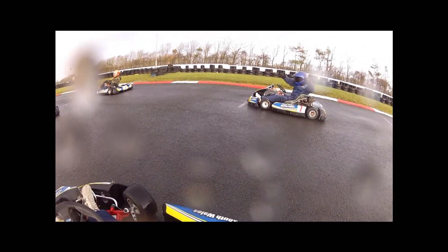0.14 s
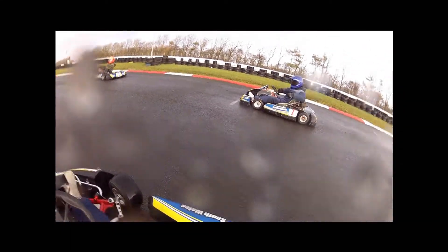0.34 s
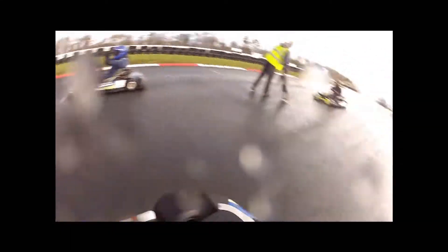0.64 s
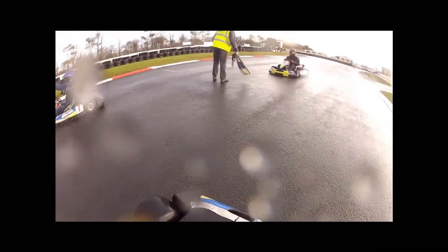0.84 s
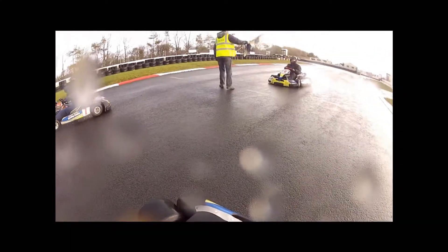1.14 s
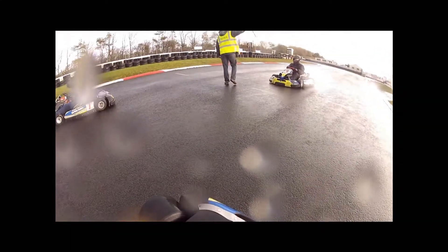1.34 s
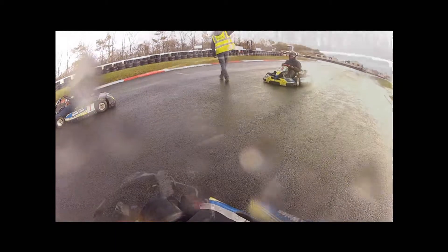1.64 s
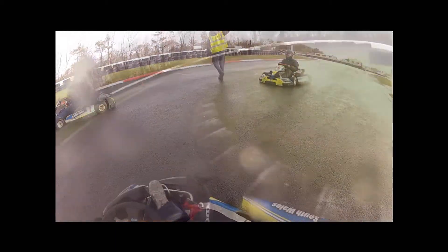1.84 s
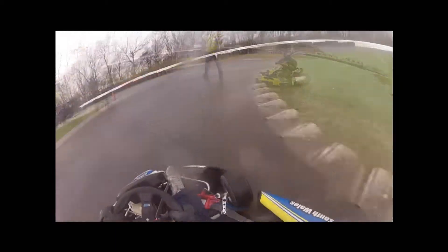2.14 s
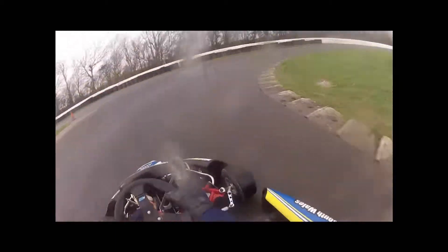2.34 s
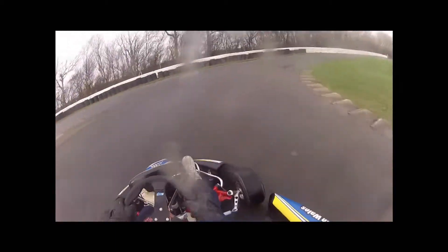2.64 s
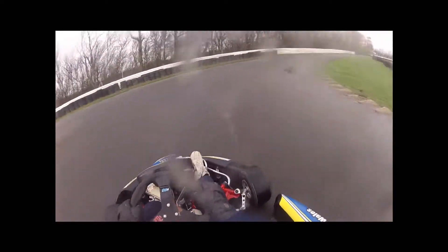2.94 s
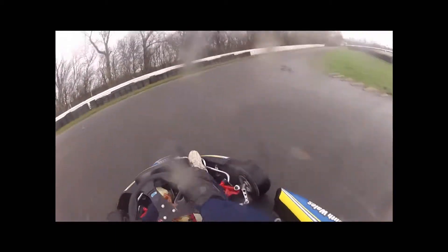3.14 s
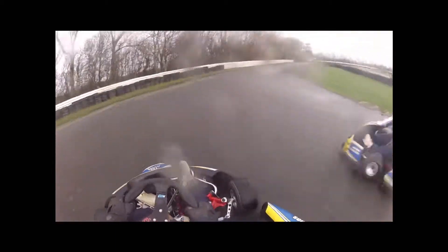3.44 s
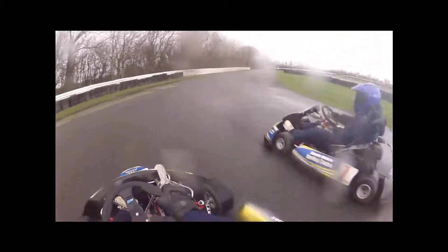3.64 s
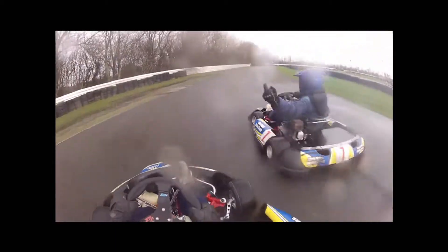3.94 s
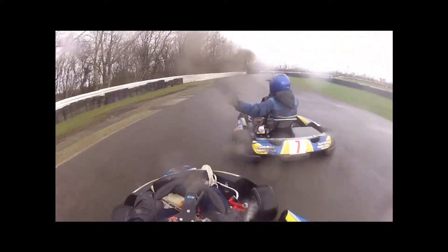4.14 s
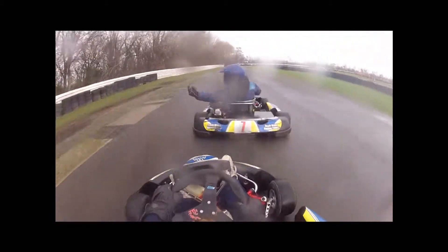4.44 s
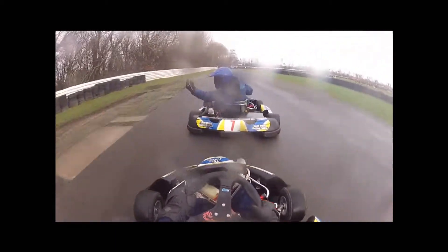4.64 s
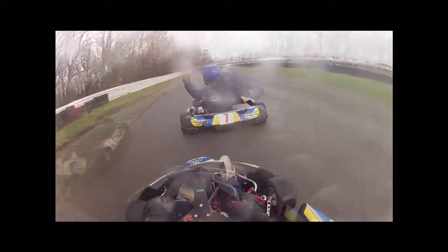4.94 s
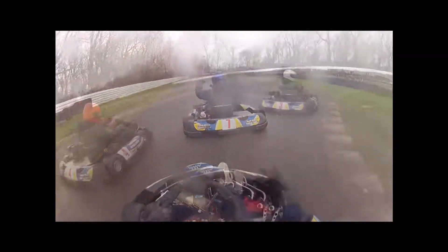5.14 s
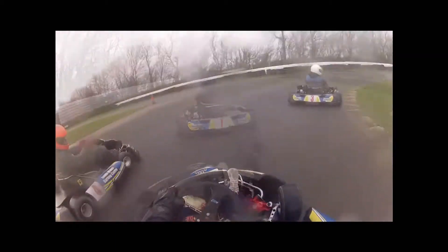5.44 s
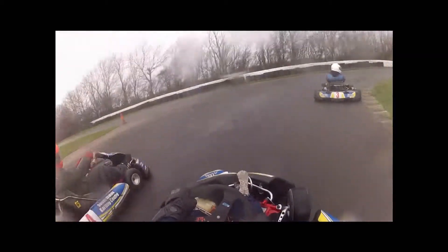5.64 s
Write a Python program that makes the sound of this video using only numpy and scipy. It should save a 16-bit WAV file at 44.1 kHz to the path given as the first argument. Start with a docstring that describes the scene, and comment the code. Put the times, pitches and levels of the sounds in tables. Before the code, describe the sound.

Quiet rolling rumble and a few water ticks, then a sudden jump to a louder go-kart engine with booming wind in an enclosed helmet microphone.

```python
"""A four-stroke go-kart's engine on a wet track, heard from inside a plastic case on the driver's helmet.
The engine is a sum of wobbling harmonics of the firing rate plus noise bursts, timed to each firing, that ring
the metal. At first the kart only rolls, as shaped noise, while drops tick on the case as short noise pulses; then the
sound jumps to a louder passage with engine and wind: noise through the case's resonances, and buffets as sine pulses.
A second kart overtakes closely as its own noise bursts; squeaks glide with their alias; 12 kHz interference is faint."""
import sys
import numpy as np
from scipy import signal
from scipy.fft import rfft, irfft
from scipy.io import wavfile
from scipy.ndimage import uniform_filter1d

SR = 44100
rng = np.random.default_rng(int(sys.argv[2]) if len(sys.argv) > 2 else 0)


def put_to_file(sound):
    """Save the sound as 16-bit audio at rate SR, in the file named by the first command-line argument."""
    columns = np.atleast_2d(sound).T  # one column per channel
    safe = np.clip(columns, -1, 1)
    whole_steps = np.round(safe * 32767)
    wavfile.write(sys.argv[1], SR, whole_steps.astype(np.int16))


N = 255780
TIME = np.arange(N) / SR
FREQ = np.maximum(np.arange(N // 2 + 1) * SR / N, 1)
# a cut: the sound jumps to a louder passage with engine and wind
JUMP_S = 1.483

# Own engine's firing rate. Each row: time in seconds, firings per second in Hz.
FIRING_RATE = [(1.5, 28.0), (2.75, 26.0), (2.9, 27.69), (3.1, 30.66), (3.5, 31.85), (4.0, 32.36),
               (4.6, 32.23), (5.2, 32.4), (5.8, 32.06)]


def undb(db):
    """Decibels to gain."""
    return np.exp(np.asarray(db) * (np.log(10) / 20))


def unit(x):
    """Scale to rms 1."""
    return x / np.sqrt(np.mean(x ** 2))


def curves(rows):
    """Each column of a table, joined by straight lines in time."""
    time_s, *columns = np.transpose(rows)
    return [np.interp(TIME, time_s, column) for column in columns]


def noise():
    """White noise."""
    return rng.standard_normal(N)


def walk(rate_hz):
    """Smooth random signal of rms 1 that changes about rate_hz times a second."""
    width = max(int(SR / rate_hz), 1)
    smooth = uniform_filter1d(noise(), width, mode="wrap")
    return unit(uniform_filter1d(smooth, width, mode="wrap"))


def shape(x, gain):
    """Minimum-phase filter with the given relative gain at each frequency."""
    cepstrum = irfft(np.log(gain / gain.max() + 1e-5), N)
    # fold onto positive time: causal
    cepstrum[1:N // 2] *= 2
    cepstrum[N // 2 + 1:] = 0
    return irfft(rfft(x) * np.exp(rfft(cepstrum)), N)


def ring(x, modes):
    """Pass through steep-sided resonances (Hz, width in Hz, dB); rms 1."""
    power = 0
    for hz, width_hz, db in modes:
        detuning = (FREQ ** 2 - hz ** 2) / (FREQ * width_hz)
        power = power + undb(db) ** 2 / (1 + detuning ** 2 / 2) ** 2
    return unit(shape(x, np.sqrt(power)))


def tinted(spectrum):
    """Noise with a spectrum of (Hz, dB per Hz) points, joined over log frequency; rms 1."""
    hz, db = np.transpose(spectrum)
    return unit(shape(noise(), undb(np.interp(np.log(FREQ), np.log(hz), db))))


def reflected(x, lag_s, sway_s, share):
    """Add a reflection whose path length sways, so that the colour drifts."""
    return x + share * np.interp(TIME - lag_s - sway_s * walk(8.8), TIME, x)


def cycles(hz, firing_s):
    """Count of engine cycles, whole at each firing; firing_s is the time of one firing."""
    count = np.cumsum(hz) / SR
    return count - np.interp(firing_s, TIME, count)


def bursts(turn, hz, lead_s, rise_s, decay_s, scatter_db, grit_db=2):
    """One burst of gritty noise per cycle, each of random strength."""
    turn = turn + lead_s * hz
    age_s = turn % 1 / hz
    strengths = undb(scatter_db * (2 * rng.random(512) - 1.5))
    size = strengths[np.floor(turn).astype(int) % 512]
    grit = noise() * undb(grit_db * walk(3000))
    envelope = (1 - np.exp(-(age_s / rise_s) ** 2)) * np.exp(-age_s / decay_s)
    return size * envelope * grit


def crawl():
    """Rolling slowly: steady rumble, a boom that grows as the kart gathers way, fluttering hiss of wet tyres."""
    # Rolling rumble. Each row: frequency in Hz, level in dB per Hz.
    roll = [(15, -4), (30, 6), (48, -6), (70, -3), (150, -2), (240, 4.5), (320, -4.5), (480, -13),
            (750, -17.5), (1500, -41)]
    # Case resonances at a crawl. Each row: frequency in Hz, width in Hz, level in dB.
    case_slow = [(1186, 360, 0.5), (1610, 180, 2), (1910, 250, 2), (2420, 310, 0), (2970, 1100, -11.5),
                 (3527, 206, 5), (4270, 1400, -14.5), (7300, 1000, -17.5), (8470, 220, -2),
                 (9840, 900, -12.5), (10640, 130, -16), (14100, 990, -14.5)]
    hiss_db, rumble_db, boom_db, boom_db_per_s = -56, -55.5, -64, 9
    rumble = tinted(roll) * undb(rumble_db + 1.7 * walk(39))
    boom = ring(noise(), [(107, 23, 0)]) * undb(boom_db + boom_db_per_s * TIME)
    flutter = noise() * undb(1.6 * walk(1000) + 1.37 * walk(61))
    hiss = ring(flutter, case_slow) * undb(hiss_db)
    return (rumble + boom + hiss) * (TIME <= JUMP_S)


def squeaks(bend=0.25, mirror_hz=6000):
    """Rubbing metal squeaks briefly, with a mirror image about 6 kHz: an alias that glides the opposite way."""
    # Squeaks in the bends. Each row: centre in seconds, length in seconds, level in dB,
    # greatest distance of the tones from the mirror frequency in Hz.
    squeak_rows = [(2.825, 0.011, -49.5, 1380), (2.887, 0.006, -53, 1380), (2.926, 0.0075, -48, 1170),
                   (5.702, 0.033, -51, 1530)]
    # Lower, then upper tone. Each row: waver in Hz, level in dB.
    tone_rows = [(87, 0), (80, -3.5)]
    out = 0
    for at_s, length_s, db, offset_hz in squeak_rows:
        swell = np.exp(-((TIME - at_s) / length_s) ** 2 / 2)
        for side, (waver_hz, tone_db) in zip((-1, 1), tone_rows):
            offset = side * offset_hz * (1 + bend * (swell - 1))
            glide_hz = mirror_hz + offset + waver_hz * walk(1500)
            tone = np.sin(2 * np.pi * np.cumsum(glide_hz) / SR)
            out = out + undb(db + tone_db) * swell * tone
    return out * undb(2 * walk(300))


def drops(decay_s=0.0011, tick_db=-3, body_db=-2.0):
    """Drops and grit spatter on the case: a bright tick, and a duller knock that weakens for lighter ones."""
    # Each row: start in seconds, strength in dB.
    drop_rows = [(0.5472, -38.5), (0.5586, -39), (0.5677, -36), (0.631, -41), (0.6399, -37.5),
                 (0.6686, -40.5), (0.6945, -37), (0.7327, -38), (0.8036, -42), (1.0789, -42), (1.3632, -41)]
    # Ring of a drop on the case. Each row: frequency in Hz, width in Hz, level in dB.
    drop_ring = [(3600, 580, 4), (5000, 380, -2), (6900, 450, -4), (8160, 360, -0.5), (9800, 640, -6.5),
                 (14300, 800, -7)]
    # from heavy_db up, the knock is driven as strongly as the tick
    heavy_db, knock_slope_db_per_db = -39, 2.5
    tick, knock = np.zeros((2, N))
    for start_s, db in drop_rows:
        weight_db = knock_slope_db_per_db * min(db - heavy_db, 0)
        now = (TIME >= start_s) & (TIME < start_s + 10 * decay_s)
        splash = undb(db) * np.exp(-(TIME[now] - start_s) / decay_s)
        tick[now] += splash
        knock[now] += undb(weight_db) * splash
    bright = ring(tick * noise(), drop_ring) * tick.std()
    dull = ring(knock * noise(), [(1270, 300, 0.5), (2140, 510, 3)]) * knock.std()
    return undb(tick_db) * bright + undb(body_db) * dull


def buffets(pitch_hz=103.6, overtone_db=-23):
    """Eddies strike the case, which booms at one pitch for a few cycles, with a faint octave above."""
    # Each row: centre in seconds, peak in dB, swell time in seconds.
    buffet_rows = [(0.755, -37.5, 0.0055), (1.602, -19, 0.018), (1.708, -22.5, 0.0125),
                   (1.889, -21.5, 0.014), (2.037, -20, .015), (2.115, -21.5, 0.026), (2.22, -23, 0.017),
                   (2.44, -24, 0.011), (2.528, -29, 0.029), (4.971, -20.5, 0.0085), (5.085, -20, 0.029),
                   (5.218, -15, 0.021), (5.372, -19.5, 0.034), (5.674, -27, 0.012)]
    out = np.zeros(N)
    for (centre_s, db, swell_s), phase in zip(buffet_rows, rng.random(len(buffet_rows))):
        age_s = TIME - centre_s
        angle = 2 * np.pi * (pitch_hz * age_s + phase)
        boom = np.sin(angle) + undb(overtone_db) * np.sin(2 * angle)
        out += undb(db) * np.exp(-(age_s / swell_s) ** 2 / 2) * boom
    return out


def air():
    """Wind booms in the case, air and spray hiss through its resonances; the booms modulate 12 kHz interference."""
    # Wind strength on the helmet. Each row: time in seconds, strength in dB.
    wind = [(1.5, 1.5), (1.72, -.5), (1.92, 3), (2.3, -2), (2.75, -3), (3.2, 0), (3.9, -1.5), (4.6, -2.5),
            (5.08, 5.5), (5.35, 3), (5.8, 2)]
    # Wind rumble. Each row: frequency in Hz, level in dB per Hz.
    rumble_spectrum = [(15, -3), (30, 4.5), (60, 0.5), (100, -3.5), (150, -2), (230, -3.5), (330, -2.5),
                       (480, -14), (800, -17), (1500, -34.5)]
    # Case resonances under air and spray. Each row: frequency in Hz, width in Hz, level in dB.
    case_modes = [(595, 830, -7.5), (843, 39, -2.5), (1196, 127, 0.5), (1544, 240, -2.5), (2000, 340, 0),
                  (2315, 303, 3.5), (3320, 410, -10), (3580, 235, -2.5), (4400, 620, -17.5),
                  (5100, 250, -15.5), (7140, 870, -20), (8430, 320, -11), (9730, 470, -8.5),
                  (10600, 110, -18), (13350, 110, -15), (14300, 290, -9.5)]
    wind_db, = curves(wind)
    hz, = curves(FIRING_RATE)
    # slopes in dB per dB of wind; rumble also grows with road speed, in dB per Hz of firing rate
    hiss_db = -43 + 1.08 * wind_db
    rumble_db = -43.5 + 0.41 * wind_db + 0.54 * (hz - hz.mean())
    boom_db = -36 + 1.54 * wind_db
    rumble = tinted(rumble_spectrum) * undb(rumble_db + 1.0 * walk(37))
    boom = ring(noise(), [(101.3, 22, 1.0), (67, 17.3, -6.5), (217, 27, -16.5)]) * undb(boom_db)
    thumps = buffets()
    spray = noise() * undb(0.75 * walk(810) + 1 * walk(38))
    # the hiss is briefly stronger at the sudden jump in level
    spray = spray * (1 + 0.3 * np.exp(-np.abs(TIME - JUMP_S) / 0.005))
    hiss = ring(spray, case_modes) * undb(hiss_db + .5 * walk(6.6))
    # faint electrical interference at 12 kHz, its strength modulated by the booms
    interference = undb(-35.0) * (boom + thumps) * np.sin(2 * np.pi * 12000 * TIME)
    return (rumble + boom + hiss + interference) * (TIME > JUMP_S) + thumps


def rival(firing_hz=30.3, firing_s=3.741):
    """A second kart barks past at its own steady revs: one noise burst per firing, mirrored by the wet tarmac."""
    # Pass of the kart. Each row: time in seconds, level in dB.
    passing = [(3.2, -51), (3.6, -50), (3.75, -38.5), (3.9, -43.5), (4.08, -43.5), (4.2, -47), (4.5, -71)]
    # Its resonances. Each row: frequency in Hz, width in Hz, level in dB.
    rival_body = [(1180, 570, -7), (2080, 630, -4), (3560, 290, 1), (5290, 300, -7.5), (6640, 460, -12),
                  (8350, 340, -7), (9800, 700, -13.5), (14100, 1200, -19)]
    near_db, = curves(passing)
    hz = np.full(N, firing_hz)
    turn = cycles(hz, firing_s)
    bark = bursts(turn, hz, lead_s=0.0031, rise_s=0.0049, decay_s=0.0033, scatter_db=3.5)
    bark = reflected(bark, lag_s=0.001196, sway_s=0.00032, share=0.63)
    present = (TIME > passing[0][0]) & (TIME < passing[-1][0])
    return undb(near_db) * ring(bark, rival_body) * present


def dip(start_s=3.81, fall_s=.08, hold_s=.18, recover_s=.17, depth_db=-17):
    """One brief dip of the crank-rate thrum, in dB: quick fall, hold, slower recovery."""
    age_s = TIME - start_s
    fall = np.clip(age_s / fall_s, 0, 1)
    recovery = np.exp(-np.maximum(age_s - fall_s - hold_s, 0) / recover_s)
    return depth_db * fall * recovery


def engine(firing_s=2.957, frame_hz=31.6, frame_width_hz=0.39):
    """The single cylinder thrums through the exhaust; each firing cracks and rattles the metal."""
    # Throttle: a blip in the bend, then held open. Each row: time in seconds, opening in dB.
    throttle = [(1.5, -18), (2.0, -5), (2.5, -17), (2.9, -10.5), (3.0, 0.5), (3.7, 2.5), (4.1, 5.5),
                (5.8, 4)]
    # Exhaust harmonics. Each row: multiple of the firing rate, relative level in dB.
    orders = [(1, -30), (2, -3), (3, -8), (4, -17.5), (5, -19), (6, -16), (7, -40), (9, -23.5), (10, -18.5),
              (12, -18.5)]
    # Resonances of the sharp crack, the clatter and the body panels.
    # Each row: frequency in Hz, width in Hz, level in dB.
    crack_modes = [(3640, 340, -7), (4710, 390, 6), (5270, 340, 7), (6770, 360, 5.5), (7410, 250, 2),
                   (8770, 250, 0.5), (9910, 590, 2.5)]
    clatter_modes = [(400, 200, -3), (798, 41, -5.5), (1197, 122, 1), (1720, 430, -7), (2010, 370, 3),
                     (2357, 260, 3.5), (2652, 86, 0.5), (3060, 120, -5), (3900, 420, -8), (8100, 210, -11),
                     (9500, 180, -6.5), (10100, 100, -21), (14250, 1000, -11.5)]
    panel_modes = [(1219, 63, 6), (1560, 160, 0.5), (1941, 270, 0), (2515, 68, -7.5), (3623, 216, -0.5),
                   (8350, 134, -4.5), (10740, 140, -13)]
    hz, = curves(FIRING_RATE)
    throttle_db, = curves(throttle)
    # peaks where the firing rate meets the frame's resonance
    resonance = np.exp(-((hz - frame_hz) / frame_width_hz) ** 2 / 2)
    crank_db = -30 + .42 * throttle_db + 3.5 * resonance + dip()
    # panels buzz a little at any revs, hard at the resonance
    buzz = undb(-53) + undb(-45) * resonance
    turn = cycles(hz, firing_s)
    thrum = 0
    for multiple, db in orders:
        wobble = 0.0091 * multiple * walk(8.3) + rng.random()
        # twice the firing rate is the crank rate, with its own level
        level_db = crank_db if multiple == 2 else .5 * throttle_db - 37.0
        tone = np.sin(2 * np.pi * (multiple * turn + wobble))
        thrum = thrum + undb(db + level_db + walk(14)) * tone
    crack = bursts(turn, hz, lead_s=0.0048, rise_s=0.0065, decay_s=0.0039, scatter_db=2)
    # the piston knocks again, more softly, one crank turn later
    knock = bursts(turn + .5, hz, lead_s=.003, rise_s=0.0038, decay_s=0.0053, scatter_db=13)
    rattle = bursts(turn, hz, lead_s=0.0045, rise_s=0.0045, decay_s=0.01, scatter_db=2.0)
    # the rattle also reaches the helmet by way of the swaying bodywork
    rattle = reflected(rattle, lag_s=0.00152, sway_s=0.000266, share=0.63)
    metal = undb(-55.0) * ring(crack + 0.19 * knock, crack_modes)
    metal = metal + undb(-47.5) * ring(rattle, clatter_modes)
    # the panels ring on longest between firings
    shaking = bursts(turn, hz, lead_s=0.0032, rise_s=0.0023, decay_s=0.019, scatter_db=2.0)
    panels = ring(shaking, panel_modes)
    return (TIME > JUMP_S) * (thrum + undb(throttle_db) * metal + buzz * panels)


def scene():
    """Everything at the one microphone."""
    return (crawl() + squeaks() + drops() + air() + rival() + engine())[None]


def record(dry, top_hz=15400):
    """The camera rounds the biggest booms and cuts the top."""
    rounded = np.tanh(2 * dry) / 2
    low_pass = signal.ellip(10, .2, 80, top_hz, fs=SR, output="sos")
    return signal.sosfilt(low_pass, rounded)


dry = scene()
out = record(dry)
put_to_file(out)
```